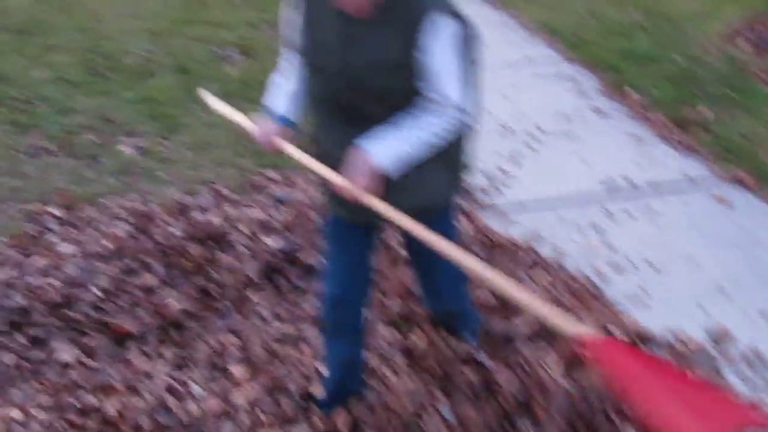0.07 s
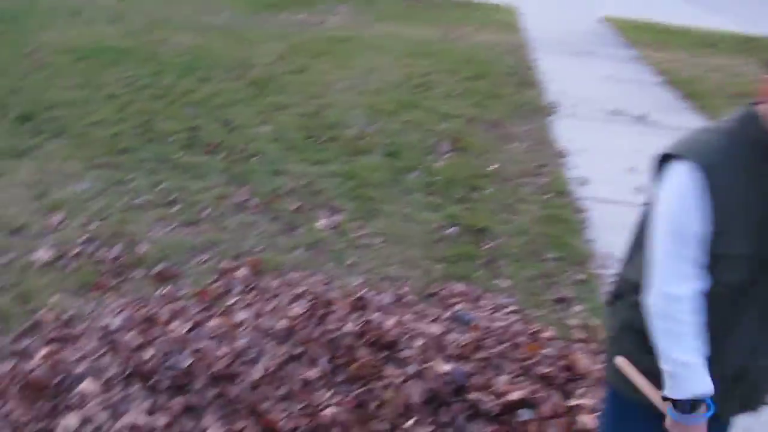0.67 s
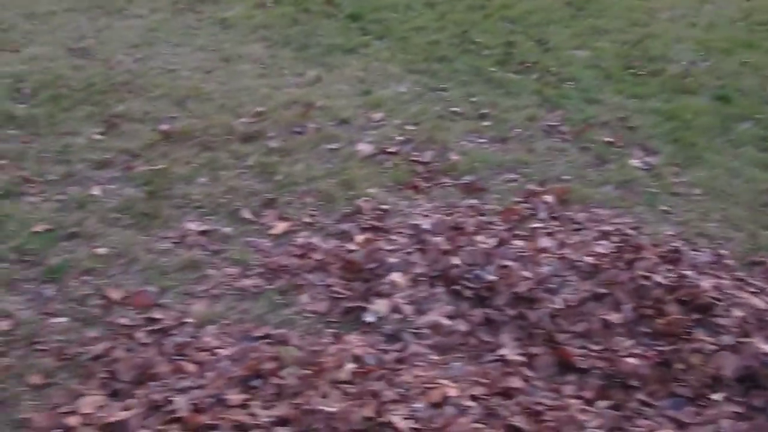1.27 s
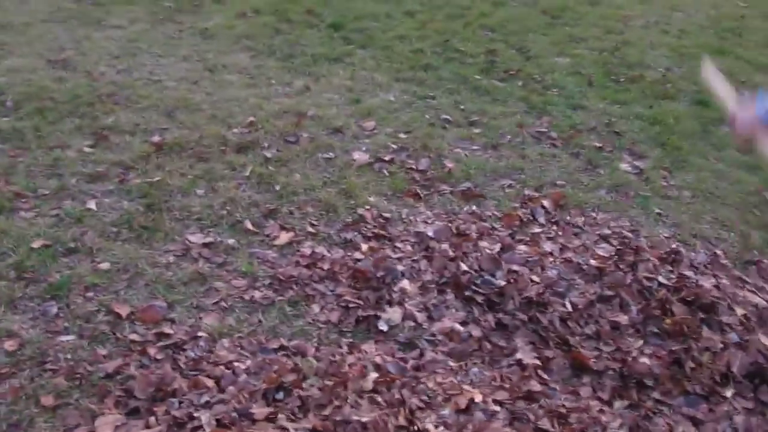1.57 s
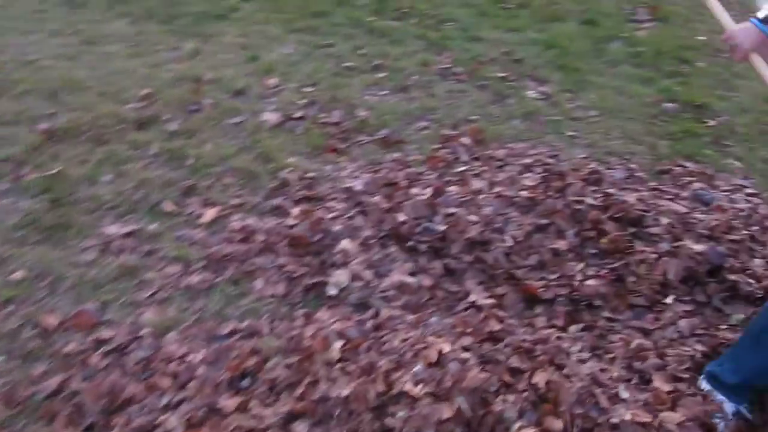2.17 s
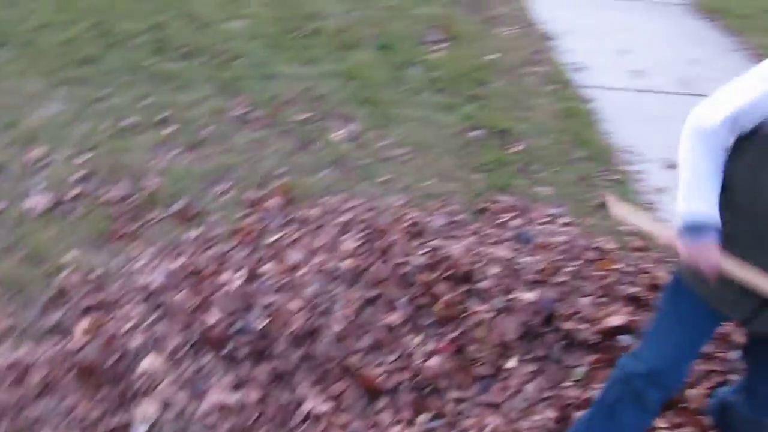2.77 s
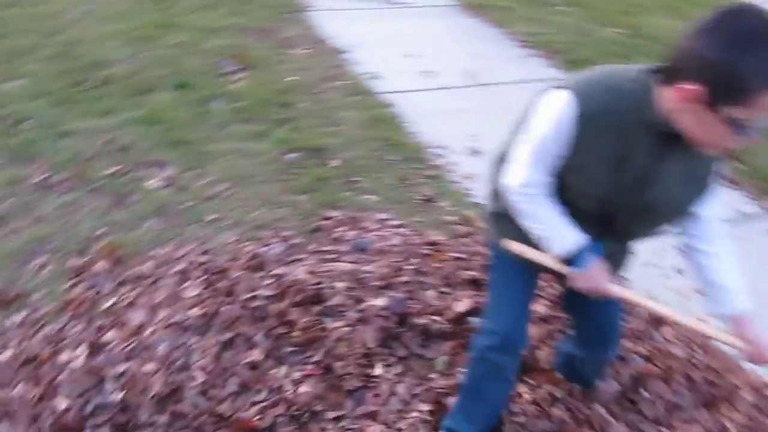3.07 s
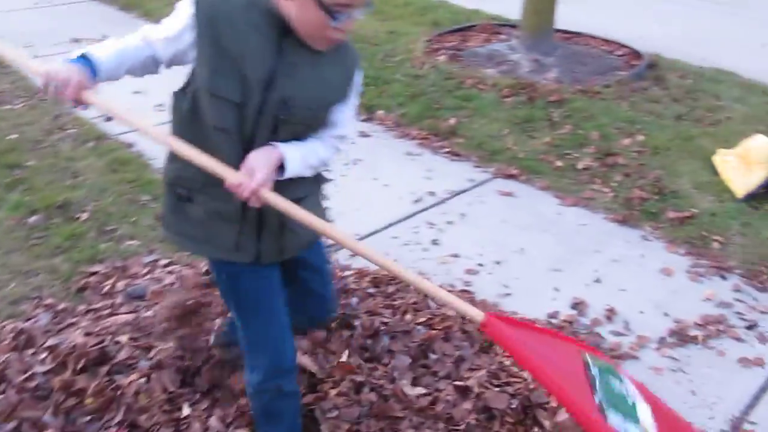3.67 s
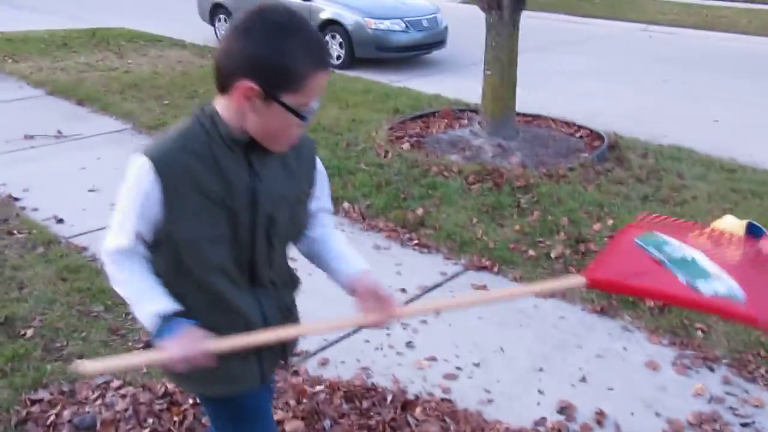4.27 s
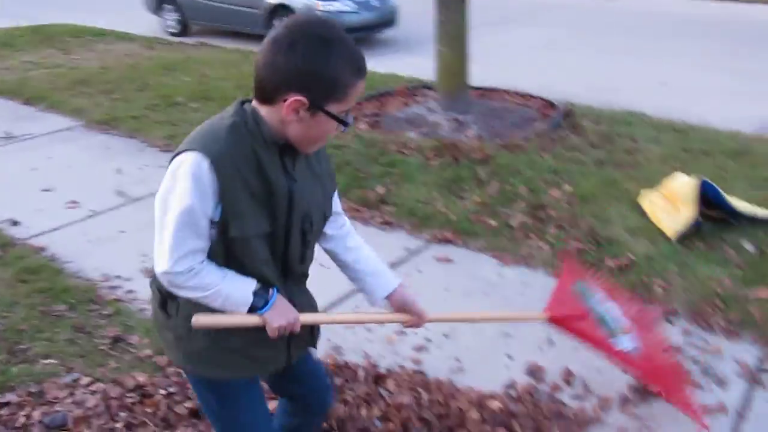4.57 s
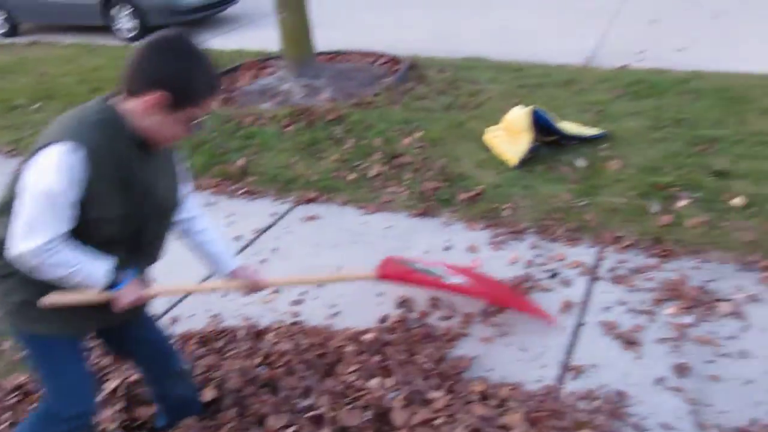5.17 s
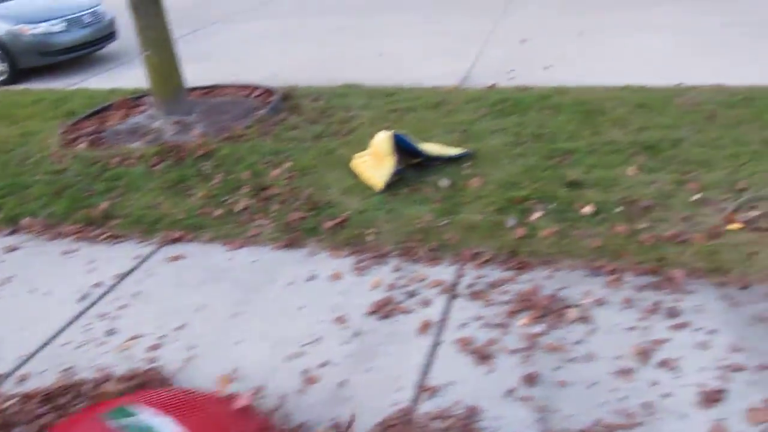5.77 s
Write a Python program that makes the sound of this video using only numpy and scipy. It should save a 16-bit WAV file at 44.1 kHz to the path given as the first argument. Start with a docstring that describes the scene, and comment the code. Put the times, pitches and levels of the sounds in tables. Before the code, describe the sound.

A plastic rake works through dry leaves outdoors, close to one microphone, with crackling, hissing sweeps throughout. At about 0.6 seconds the head lands on concrete with a hollow knock, its tines clattering and bouncing until 0.9. A gritty scrape builds from 1.2 to 1.5 seconds as several stems snap. Softer rustling follows, with one faint footstep thud on grass at 2 seconds. The tines clatter again around 2.9 seconds, leading into the loudest, harshest scrapes from 3.2 to 3.4. Full leafy sweeps come at 3.4 and 3.8 seconds. A third bouncing clatter, with a low knock from the head, runs from 4.6 to 4.8. A last scrape swells through the leaves and peaks at 5.6 seconds. The overall level ducks at loud hits and creeps back. Light wind and distant traffic make a faint, wavering rumble underneath.

```python
"""Raking dry leaves

A plastic rake works a pile of dry leaves beside a pavement, close to a camera with one microphone.
The leaves crackle as they are pushed; the tines (the rake's teeth) scrape over the concrete and drum
on its fan-shaped head. Three times the rake comes down and its tines clatter and bounce. Wind and far
traffic rumble underneath. The camera turns everything down at each clatter and slowly lets it back."""
import sys
import numpy as np
from scipy import signal
from scipy.fft import rfft, irfft, next_fast_len
from scipy.io import wavfile
from scipy.ndimage import uniform_filter1d, map_coordinates

SR = 44100
rng = np.random.default_rng(int(sys.argv[2]) if len(sys.argv) > 2 else 0)


def wrap_up_sound(samples):
    """Save the sound to the file named by the first command line argument, as 16-bit audio."""
    columns = np.atleast_2d(samples).T
    # keep every value between -1 and 1, then stretch to whole-number steps
    tamed = np.clip(columns, -1, 1)
    steps = np.round(tamed * 32767).astype(np.int16)
    wavfile.write(sys.argv[1], SR, steps)


N = 257103


# tone of the rustle, from low to high: f/Hz, level/dB
LEAF_TONE = [(250,-12.5), (500,-13.5), (630,-5.5), (800,-6.5), (1050,-7.5), (1450,-4), (1850,-3.5),
             (3000,0), (4400,-1), (7300,0), (9600,-0.5), (11500,-7.5), (13700,-17), (16000,-24)]
# sweeps through the leaves: fullest at t/s, level/dB, rise/s, fall/s, extra treble/dB
LEAF_SWEEPS = [(0, -31, .2, 0.39, 2.5), (.51, -36.5, 0.46, 0.68, -1.5), (1.22, -33.5, 0.87, 1, 1.5),
               (1.6, -31.5, 0.16, 0.34, 5.5), (1.87, -34, 0.19, 0.31, 3.5), (2.17, -32, 0.43, 0.37, -0.5),
               (2.42, -40.5, 0.39, 0.33, 7), (2.9, -34, 0.21, 0.34, 6), (3.37, -24, .15, 0.5, 1),
               (3.77, -27, 0.18, 0.47, 1), (4.235, -35, 0.37, 0.12, -1), (4.6, -33, 0.27, 0.52, -1.5),
               (5.57, -25, 0.56, 0.32, -10), (5.8, -29, 0.6, .25, 0)]
def leaves(settling_db=-51.5, treble_hz=8700):
    """Thousands of tiny cracks over the hiss of leaf sliding on leaf; drier leaves sound brighter."""
    sweeps = [(amp(db) * swell(s, rise, fall), crisp_db) for s, db, rise, fall, crisp_db in LEAF_SWEEPS]
    sweeps.append((amp(settling_db), 0))  # leaves still shift between sweeps
    level = together(gain for gain, _ in sweeps)
    treble_level = together(gain * amp(crisp_db) for gain, crisp_db in sweeps)
    cracks = grains(per_second=8000, spread_db=2.6)
    rustle = patchy(cracks + 0.8 * rng.standard_normal(N), depth_db=1.3)
    rustle = unit(filtered(rustle, colour(LEAF_TONE)))
    treble = filtered(rustle, lambda hz: 1 - 1 / (1 + (hz / treble_hz) ** 10))
    return ((rustle - treble) * level + treble * treble_level) * amp(0.2 * wobble(35))


# notes at which the plastic fan rings: f/Hz, width/Hz, level/dB
FAN_NOTES = [(170, 9.3, -6), (242, 11, -5), (301.3, 17.3, -0.5), (395, 29.6, 1), (551, 66, -11),
             (734, 34, -7), (910, 44, -12.5), (1107, 99, -4.5), (1419, 13, -2)]
# notes at which the tines ring: f/Hz, width/Hz, level/dB
TINE_NOTES = [(1065, 47, -10), (1396, 32, -11.5), (1954, 255, -4), (2800, 79, 3), (3295, 330, 2),
              (4220, 340, -9.5), (4920, 600, -9.5), (6850, 970, -1), (9370, 930, -1.5)]
# tone of plastic on grit: f/Hz, level/dB
GRIT_TONE = [(250,-27.5), (500,-17.5), (1000,-18.5), (1550,-9.5), (2000,-3.5), (2450,-1.5), (3050,2),
             (3500,-2.5), (4200,-1.5), (5900,-9), (7200,-7), (9600,-7), (12800,-19), (16000,-47)]
# drags on the ground: hardest at t/s, level/dB, rise/s, fall/s, fan against scrape/dB, tine note f/Hz
TINE_DRAGS = [(0, -35, .2, 0.23, -20, 2900), (.57, -40.5, 0.46, 0.12, -17, 3400),
              (.89, -38.5, 0.024, .15, -1, 3000), (1.23, -26.5, 0.51, 0.34, -10.5, 2880),
              (1.47, -18, 0.15, .07, -19, 2950), (2.16, -31.5, 0.59, .23, -20, 2760),
              (3.208, -12, 0.028, 0.063, -16, 4000), (3.253, -5.5, .05, 0.029, -19.5, 4000),
              (3.34, -7, 0.033, 0.086, -26.5, 3130), (3.81, -32.5, .43, .31, -16.5, 3900),
              (5.34, -26, 0.33, 0.42, -12, 3300), (5.61, -14, 0.29, 0.057, -17, 3730)]
def scrape(note_share=0.42, note_sharpness=4.3):
    """Tines catch and slip on the grit and rasp, most at one note; the same slips drum on the fan."""
    drags = [(amp(db) * swell(s, rise, fall), fan_db, hz) for s, db, rise, fall, fan_db, hz in TINE_DRAGS]
    level = together(gain for gain, _, _ in drags)
    fan_level = together(gain * amp(fan_db) for gain, fan_db, _ in drags)
    slips = grains(per_second=1100, spread_db=0.5) + 0.73 * rng.standard_normal(N)
    slips *= amp(0.4 * wobble(130))  # the tines chatter in bunches
    grit = unit(filtered(patchy(slips, depth_db=1.8), colour(GRIT_TONE)))
    rasp = filtered(grains(per_second=1800, spread_db=-0.5), resonances(TINE_NOTES))
    rasp = unit(filtered(rasp, colour([(1200, -3.5), (3000, -6), (10000, -17), (16000, -4)])))
    drumming = unit(filtered(slips, resonances(FAN_NOTES)))
    friction = rng.standard_normal(N)
    notes = np.zeros(N)
    for gain, _, hz in drags:  # the bent tines ring at one note in each drag
        notes += gain * unit(signal.lfilter(*signal.iirpeak(hz, note_sharpness, SR), friction))
    scraping = level * unit(grit + 0.53 * rasp) + note_share * notes
    return scraping / np.hypot(1, note_share) + drumming * fan_level


# tone of a tine's click: f/Hz, level/dB
CLICK_TONE = [(200, -18), (600, -15), (1200, -7.5), (3000, 0), (5000, -0.5), (6200, -3), (10000, -1.5),
              (12500, -14.5), (16000, -80)]
# tines hitting the pavement: t/s, relative level/dB, hardness/dB, time to fade by 60 dB/s, note f/Hz
TINE_TAPS = [(0.6, 1, -9.5, 0.028, 5100), (0.607, -1, -2, 0.032, 3440), (0.613, 1, -4.5, 0.087, 3430),
             (0.6334, 8, -0.5, 0.028, 7760), (0.6385, 8, 5, 0.028, 3570), (0.65, -2.5, -8, .04, 3200),
             (0.6709, 8, -2.5, 0.016, 5030), (0.7103, -4.5, -5, 0.015, 3200),
             (0.7595, -13, -7, 0.037, 3120), (0.792, -12, 2, 0.02, 3260), (0.846, -5.5, -6, 0.032, 3020),
             (0.877, -2, -4, 0.028, 3920), (2.92, 0, 3, 0.012, 8300), (2.9314, 3, 0.5, 0.013, 9700),
             (2.95, -4, 4, 0.015, 9700), (2.9783, 3, 7.5, 0.043, 9900), (2.9897, 10.5, 8, 0.024, 10300),
             (3.009, 5.5, 10, 0.058, 10900), (3.034, -1.5, 6, 0.032, 2720), (3.175, -7.5, -3, 0.048, 2800),
             (3.204, 7, 15, 0.036, 2860), (3.3044, 1.5, 5, .018, 3080), (4.598, 0.5, 1, 0.0068, 4850),
             (4.6235, 0, 0, 0.011, 9900), (4.637, 6.5, 9, 0.016, 5270), (4.6627, 10.5, 3, 0.03, 2640),
             (4.673, 4.5, 0.5, 0.097, 2570), (4.709, 13, 4, 0.018, 6560), (4.7589, 3, 7.5, 0.028, 2900),
             (4.776, -8.5, -7, 0.052, 2750), (4.806, 7, 5, 0.034, 3940), (4.838, -3, 1, 0.05, 3210)]
def taps(clear_note_s=0.017):
    """Tines land in a bunch and ring briefly; a hard hit is brighter, a soft one shakes the fan more."""
    out, t = np.zeros(N), np.arange(SR // 5) / SR
    for s, db, hardness_db, fade_s, note_hz in TINE_TAPS:
        age = t / fade_s
        bunch = amp(-60 * age) * (1 - np.exp(-(age / 0.05) ** 2))  # short hits also rise faster
        scatter = np.linalg.norm(bunch) * amp(-33.5 - 60 * t / 0.12)  # sound off the ground nearby
        crack, flick, pluck, push = rng.standard_normal((4, len(t))) * (bunch + scatter)
        ring = filtered(flick, resonances(TINE_NOTES))
        ring = filtered(ring, colour([(10500, -11.5), (16000, -25)]))
        click = unit(filtered(crack, colour(CLICK_TONE))) + 0.65 * unit(ring)
        click = unit(filtered(click, colour([(3500, 0), (9000, hardness_db)])))
        ping = unit(filtered(pluck, resonances([(note_hz, note_hz / 8, 0)])))
        ping *= clear_note_s / fade_s  # shorter hits give a clearer note
        thump = unit(filtered(push, resonances(FAN_NOTES))) * amp(-25 - 0.98 * hardness_db)
        level = np.sqrt(np.mean(bunch ** 2)) * amp(db)
        add(out, s, level * (amp(-8) * (click + ping) + thump))
    return out


# the whole rake head landing flat: t/s, level/dB, f/Hz, time to fade by 60 dB/s
HEAD_BOOMS = [(0.605, -29, 280, 0.15), (0.615, -27.5, 175, 0.24), (0.645, -20.5, 392, 0.17),
              (0.861, -30.5, 292, .12), (2.924, -28.5, 391, 0.22), (3.204, -23, 258, 0.31),
              (4.669, -28.5, 178, 0.31), (4.675, -26, 244, 0.23)]
def booms(rattle_radians=0.6):
    """The flexing head rings at a low note that depends on how it lands; rattling tines unsettle it."""
    out, t = np.zeros(N), np.arange(SR // 4) / SR
    for s, db, hz, fade_s in HEAD_BOOMS:
        phase = 2 * np.pi * hz * t + rattle_radians * wobble(63)[:len(t)]
        level = amp(db - 60 * t / fade_s) * (1 - np.exp(-t / 0.0025))
        add(out, s, level * np.sin(phase))
    return out


# stems snapping under the rake: t/s, peak level/dB
STEM_SNAPS = [(1.312, -14), (1.344, -11.5), (1.3825, -9), (1.396, -12), (1.4185, -13), (1.4458, -8.5),
              (1.4688, -7.5)]
def snaps(fade_s=0.0069):
    """A dry stem breaks with one short crack."""
    out, t = np.zeros(N), np.arange(SR // 50) / SR
    stem_tone = colour([(600, -24), (1600, -12), (2900, 0), (6000, -5), (9800, -9), (16000, -38)])
    for s, db in STEM_SNAPS:
        crack = filtered(rng.standard_normal(len(t)) * amp(-60 * t / fade_s), stem_tone)
        add(out, s, amp(db) * crack / np.abs(crack).max())
    return out


# faint sliding tones: t/s, length/s, start f/Hz, end f/Hz, level/dB
FAINT_GLIDES = [(0.52,0.11,375,400,-43.5), (3.8,0.2,1850,1880,-40), (4.102,.12,1120,700,-45)]
def glides():
    """Faint fuzzy tones swell and fade: a low hum, a thin high note, a hollow swish sliding down."""
    out = np.zeros(N)
    for s, length, start_hz, end_hz, db in FAINT_GLIDES:
        slide_hz = np.geomspace(start_hz, end_hz, round(length * SR))
        hz = slide_hz * (1 + 0.039 * wobble(257)[:len(slide_hz)])
        phase = 2 * np.pi * np.cumsum(hz) / SR
        add(out, s, amp(db) * np.hanning(len(hz)) * np.sin(phase))
    return out


def footstep(at_s=1.985, db=-41, hz=185, fade_s=0.18):
    """A shoe comes down on the lawn with a soft, hollow thud."""
    out, t = np.zeros(N), np.arange(SR // 5) / SR
    hollow_tone = colour([(hz / 2, -25), (hz, 0), (1.6 * hz, -4), (4 * hz, -35), (SR / 2, -90)])
    thud = unit(filtered(rng.standard_normal(len(t)), hollow_tone))
    level = amp(db - 60 * t / fade_s) * (1 - np.exp(-t / 0.0035))
    add(out, at_s, level * thud)
    return out


# tone of the outdoor rumble: f/Hz, level/dB
RUMBLE_TONE = [(15, -17), (30, -6), (65, 1), (130, -3.5), (280, -6.5), (500, -11), (760, -5.5),
               (1100, -12.5), (3000, -13.5), (10000, -16.5), (16000, -47)]
# how strong the rumble is as time goes by: t/s, level/dB
RUMBLE_LEVELS = [(0, -49), (.55, -47), (1.2, -47.5), (2.0, -49), (2.75, -46), (3.6, -51), (4.6, -50.5),
                 (5.8, -49.5)]
def wind_and_traffic():
    """Light wind and far traffic blend into a low, wavering rumble."""
    level_db = np.interp(np.arange(N) / SR, *np.transpose(RUMBLE_LEVELS)) + 2.8 * wobble(8.4)
    return amp(level_db) * unit(filtered(rng.standard_normal(N), colour(RUMBLE_TONE)))


def amp(db):
    """Turn decibels into a gain, the number a sound is multiplied by."""
    return np.exp(np.asarray(db) * np.log(10) / 20)


def unit(x):
    """Scale a sound to an average power of 1."""
    return x / np.sqrt(np.mean(x ** 2) + 1e-20)


def wobble(per_second):
    """A smooth curve through so many random values a second."""
    values = rng.standard_normal(int(N * per_second / SR) + 4)
    return map_coordinates(values, [np.arange(N) * per_second / SR])


def swell(s, rise, fall, roundness=1.394):
    """Gain of one stroke: 1 at time s, a tenth at rise seconds before and fall seconds after."""
    t = np.arange(N) / SR - s
    return amp(-20 * np.abs(t / np.where(t < 0, rise, fall)) ** roundness)


def together(gains):
    """Overlapping noisy strokes add in power."""
    return np.sqrt(sum(gain ** 2 for gain in gains))


def filtered(x, response):
    """Pass a sound through a filter; response says what happens to each frequency."""
    size = 2 * next_fast_len(len(x) // 2 + 4096)
    hz = np.fft.rfftfreq(size, 1 / SR)
    return irfft(rfft(x, size) * response(hz), size)[:len(x)]


def colour(points):
    """A filter through (f/Hz, level/dB) points that lets clicks keep their sharp start."""
    f, db = np.transpose(points)
    def response(hz):
        gain = amp(np.interp(np.log(hz + 1), np.log(f + 1), db))
        cepstrum = irfft(np.log(gain + 1e-6))
        half = len(hz) - 1
        forward_only = np.r_[1, np.full(half - 1, 2), 1, np.zeros(half - 1)]  # no sound before the hit
        return np.exp(rfft(cepstrum * forward_only))
    return response


def resonances(notes):
    """A filter that rings at each (f/Hz, width/Hz, level/dB) note."""
    return lambda f: sum((-1) ** k * amp(db) * 1j * f * width / (hz * hz - f * f + 1j * f * width)
                         for k, (hz, width, db) in enumerate(notes))


def grains(per_second, spread_db):
    """Tiny clicks of random size at random moments."""
    chance, sign, size = rng.random(N), rng.choice([-1, 1], N), rng.standard_normal(N)
    return unit((chance < per_second / SR) * sign * amp(spread_db * np.minimum(size, 2.5)))


def patchy(x, depth_db):
    """Every leaf and tine has its own tone: random louder and softer patches in time and pitch."""
    spectrum = signal.stft(x, nperseg=256)[2]
    patches = uniform_filter1d(rng.standard_normal(spectrum.shape), size=5, axis=0)
    patches = unit(uniform_filter1d(patches, size=6, axis=1))
    return unit(signal.istft(spectrum * amp(depth_db * patches), nperseg=256)[1][:N])


def add(track, s, sound):
    """Mix a sound into a track at time s."""
    part = track[round(s * SR):][:len(sound)]
    part += sound[:len(part)]


def lagged(x, seconds):
    """Follow x smoothly, trailing it by about this many seconds."""
    keep = np.exp(-1 / (seconds * SR))
    return signal.lfilter([1 - keep], [1, -keep], x)


def gain_control(x, threshold_db=-19.5, attack_s=0.0077, recovery_db_per_s=15.5):
    """The camera's gain drops quickly by as much as x passes the threshold, then creeps back."""
    level_db = 10 * np.log10(lagged(x ** 2, seconds=0.0018) + 1e-12)
    excess_db = np.maximum(level_db - threshold_db, 0)
    recovered_db = recovery_db_per_s * np.arange(N) / SR
    cut_db = np.maximum.accumulate(excess_db + recovered_db) - recovered_db
    return amp(-lagged(cut_db, attack_s))


def scene():
    """Everything reaches one microphone and fills both channels alike."""
    rake = scrape() + taps() + booms()
    mono = rake + glides() + leaves() + snaps() + footstep() + wind_and_traffic()
    return np.array([mono, mono])


def record(dry):
    """The camera turns loud moments down, rounds off the tallest peaks and cuts the highest treble."""
    held = dry * gain_control(dry[0])
    rounded = held / (1 + np.abs(held / 0.85) ** 4) ** (1 / 4)
    treble_cut = lambda hz: (hz < 16300) / np.sqrt(1 + (hz / 15300) ** 40)
    return np.array([filtered(channel, treble_cut) for channel in rounded])


dry = scene()
out = record(dry)
wrap_up_sound(out)
```